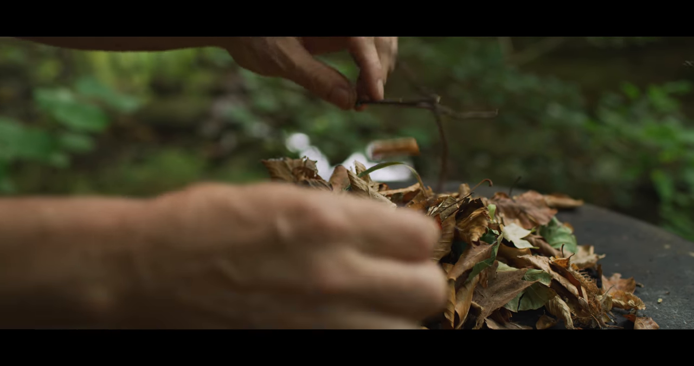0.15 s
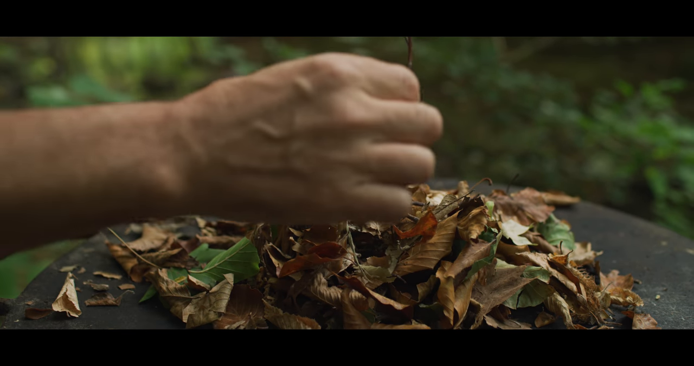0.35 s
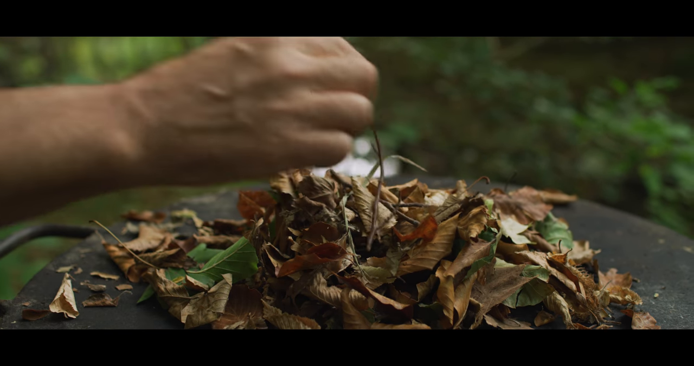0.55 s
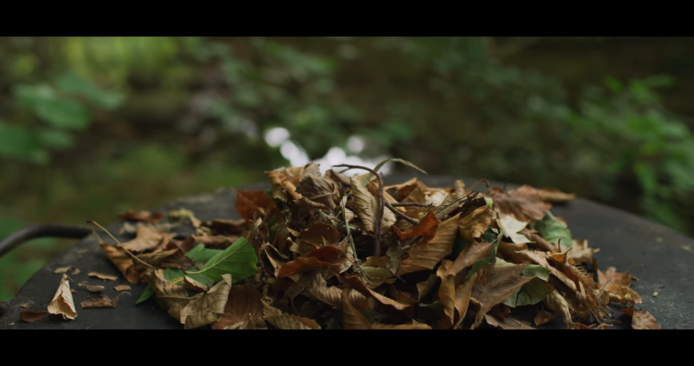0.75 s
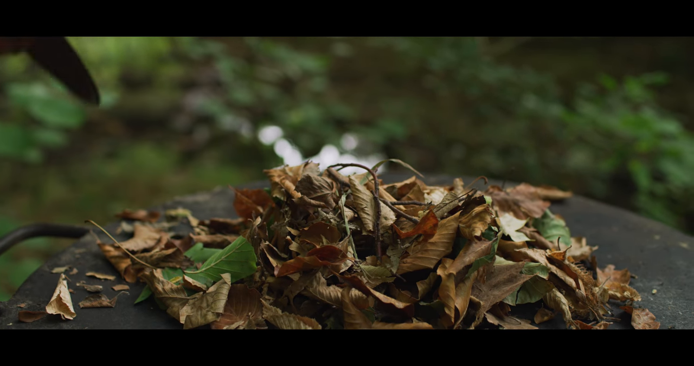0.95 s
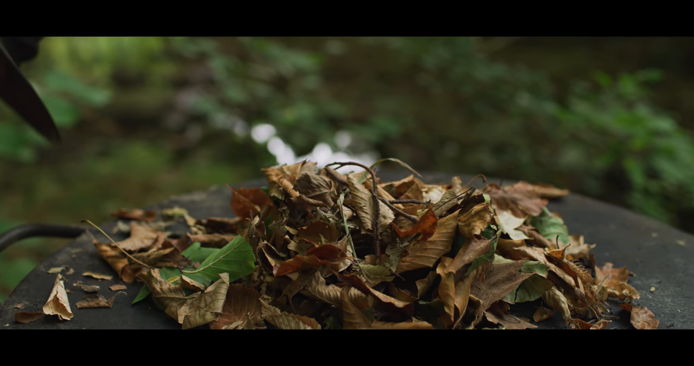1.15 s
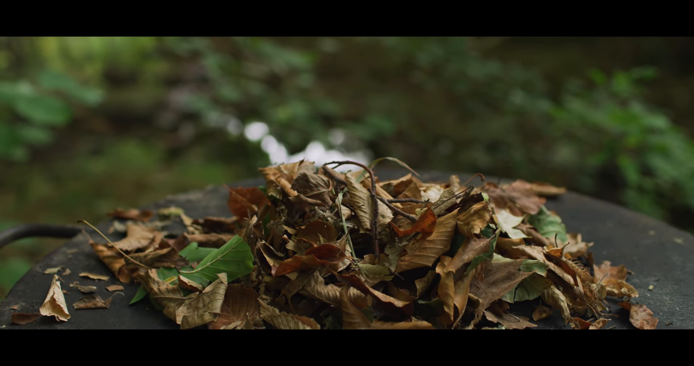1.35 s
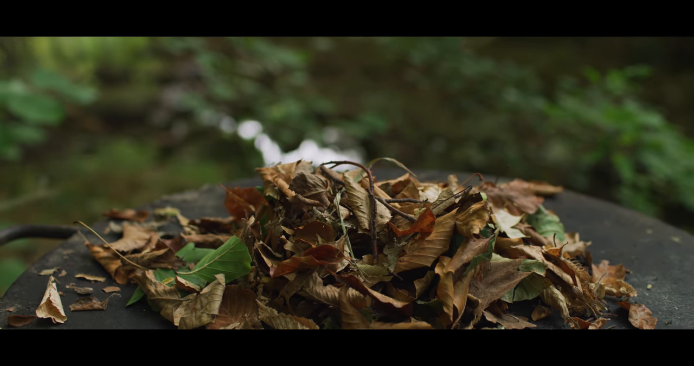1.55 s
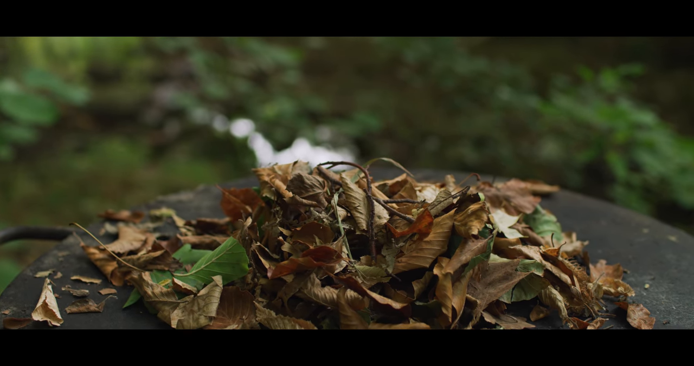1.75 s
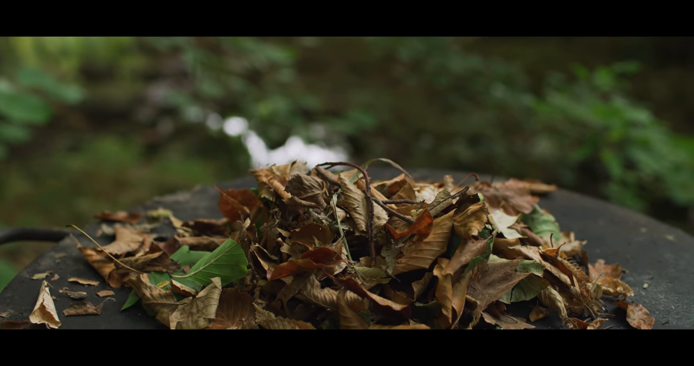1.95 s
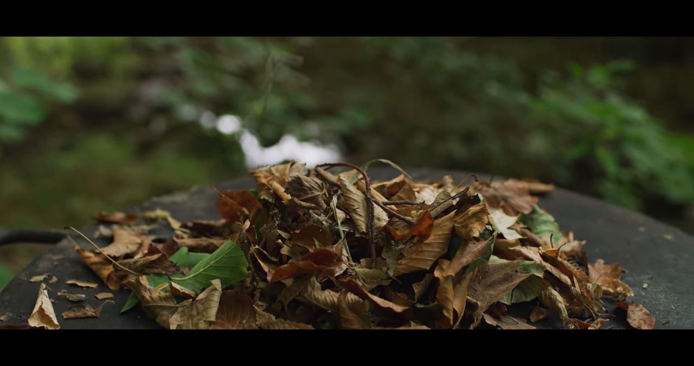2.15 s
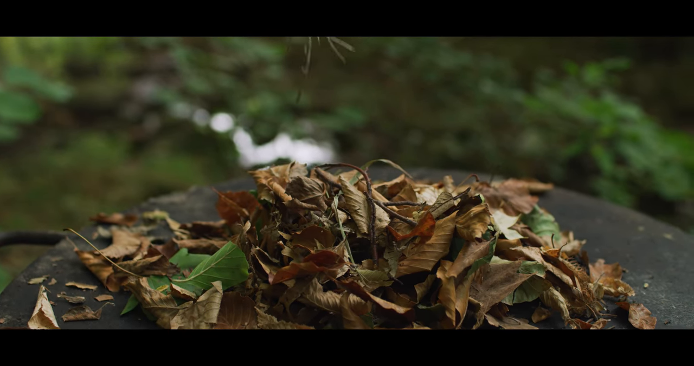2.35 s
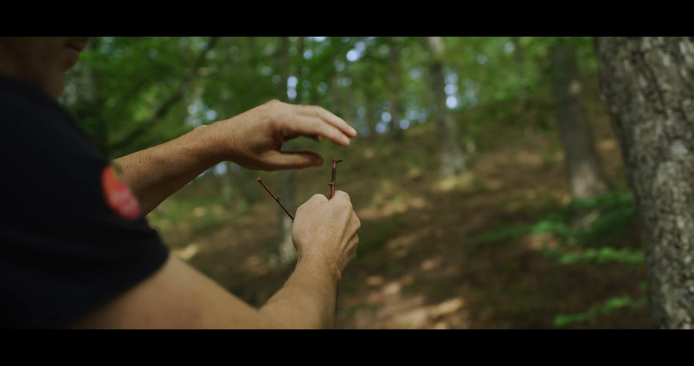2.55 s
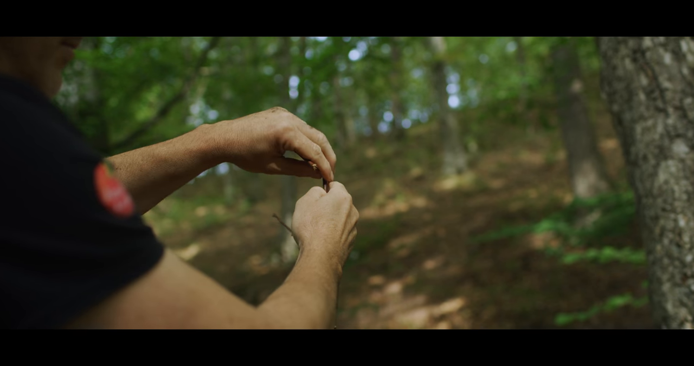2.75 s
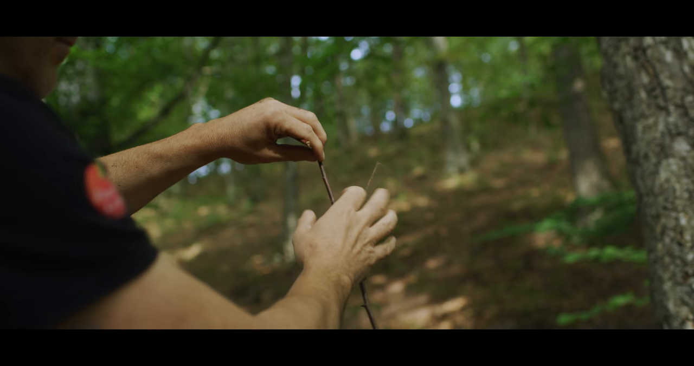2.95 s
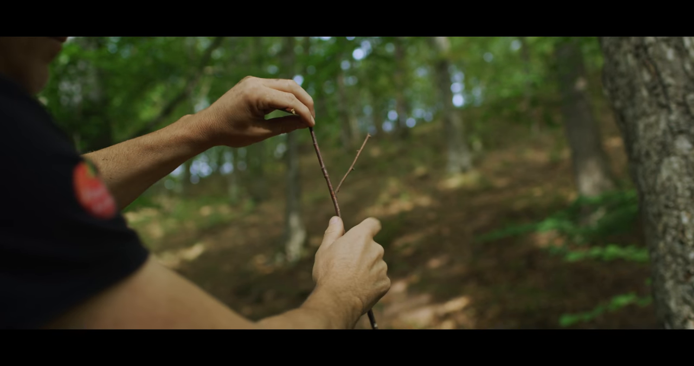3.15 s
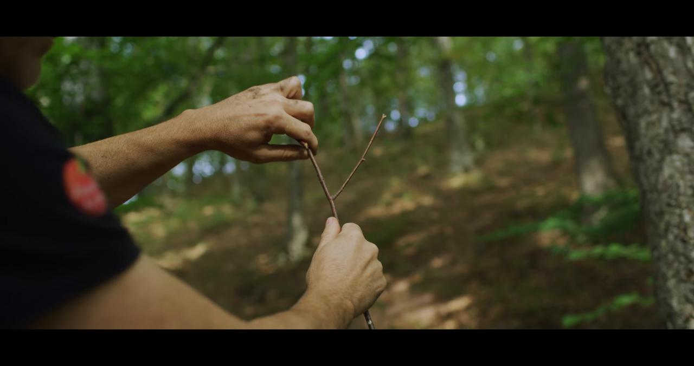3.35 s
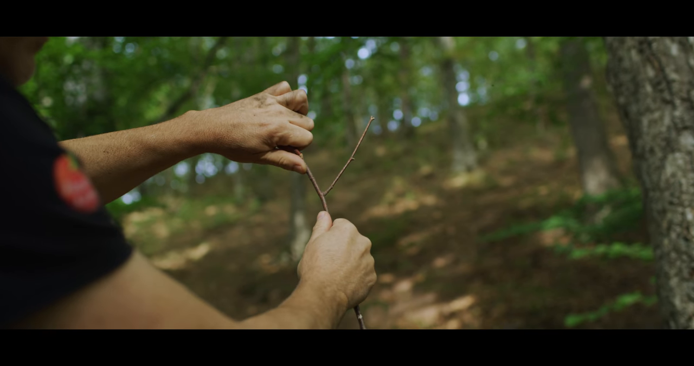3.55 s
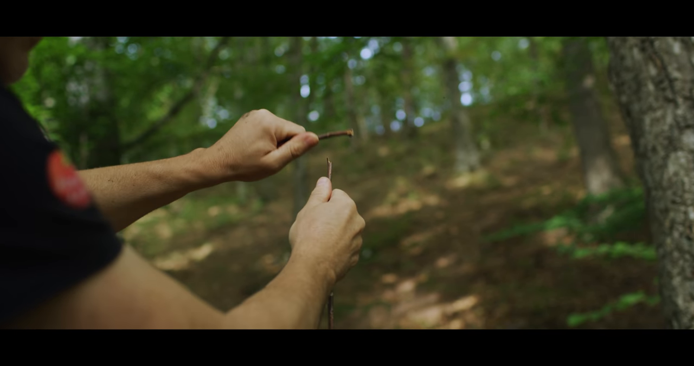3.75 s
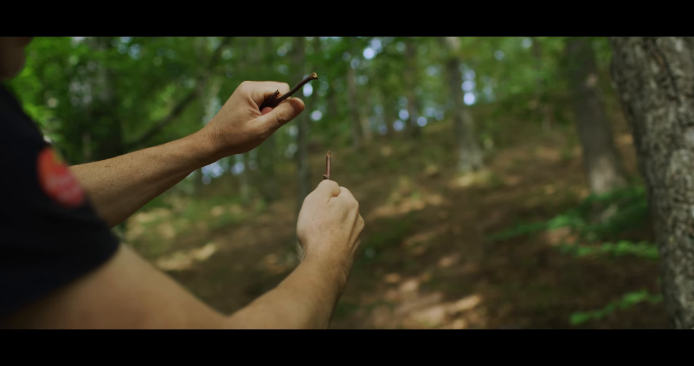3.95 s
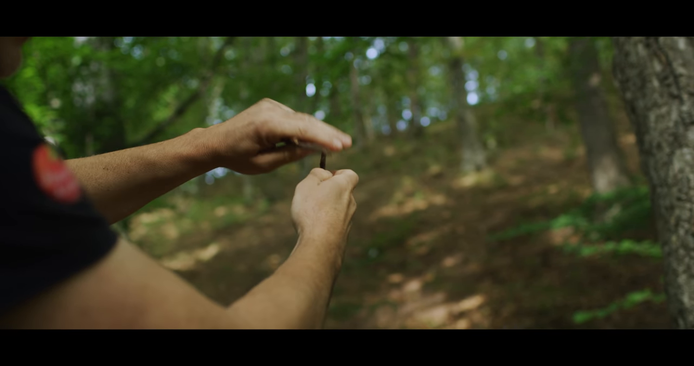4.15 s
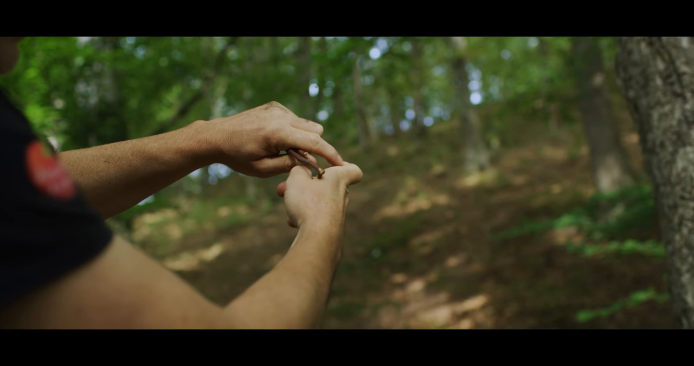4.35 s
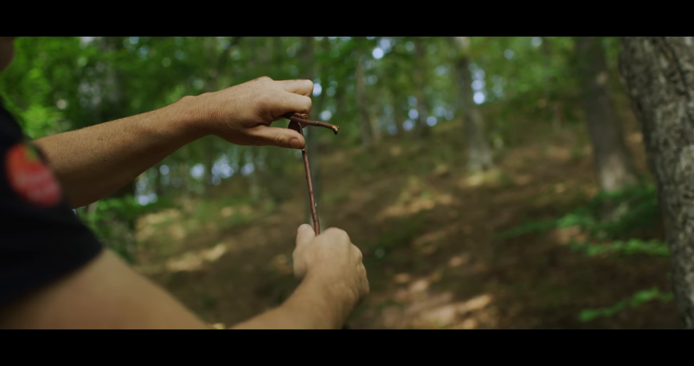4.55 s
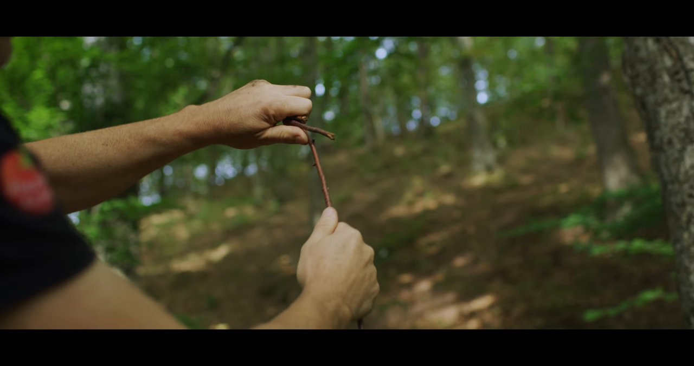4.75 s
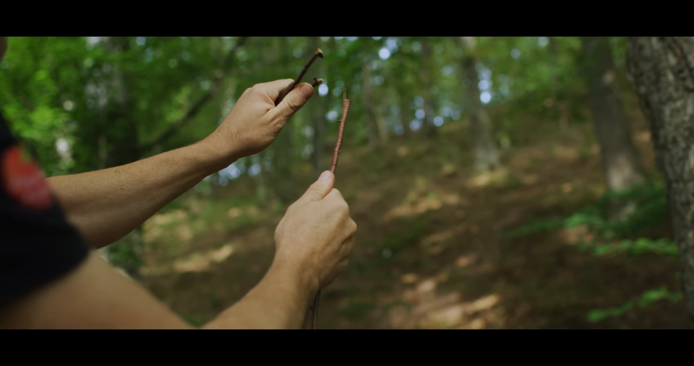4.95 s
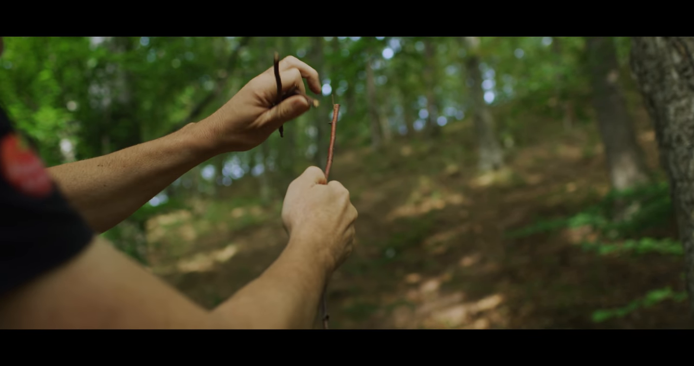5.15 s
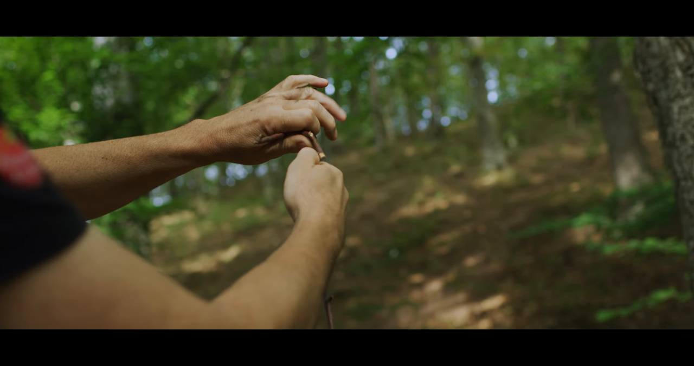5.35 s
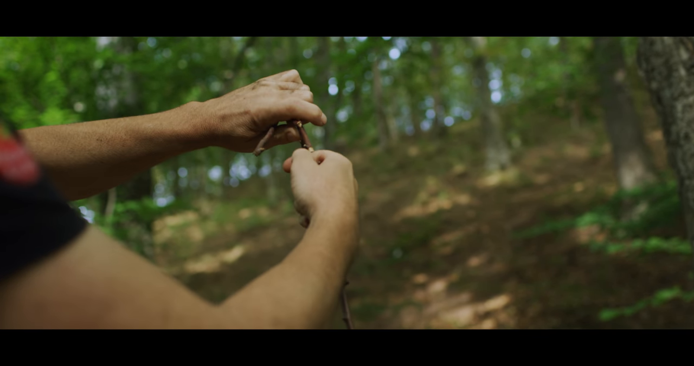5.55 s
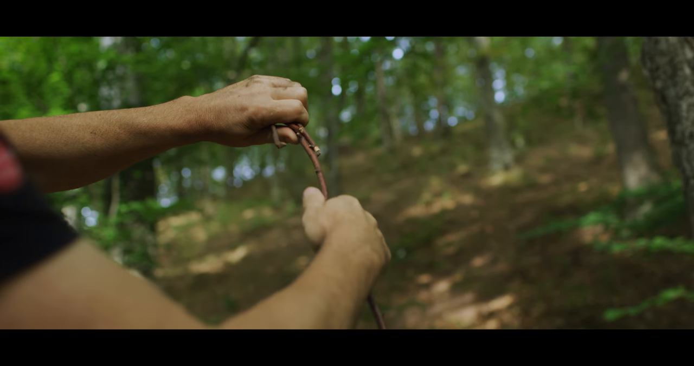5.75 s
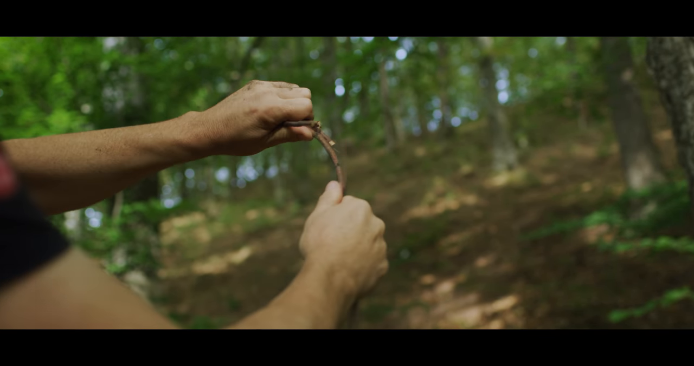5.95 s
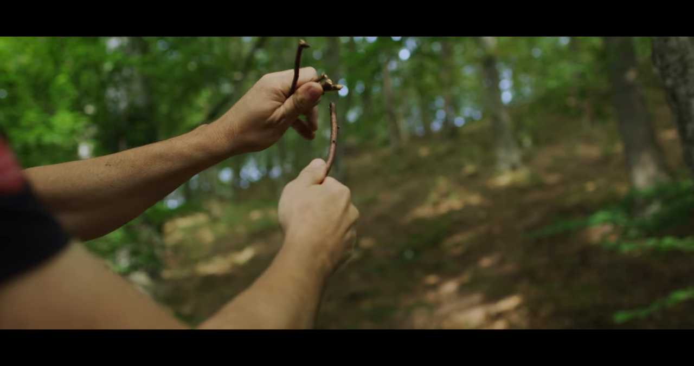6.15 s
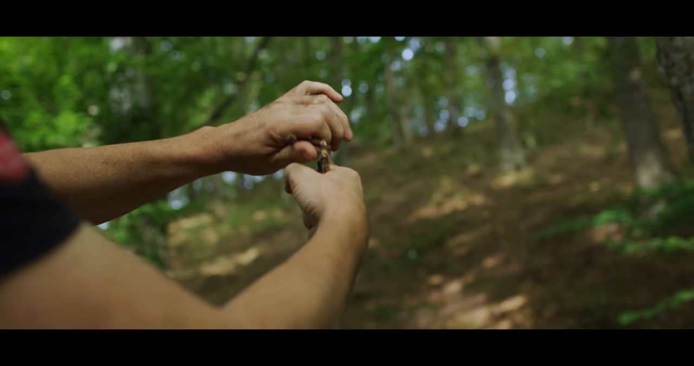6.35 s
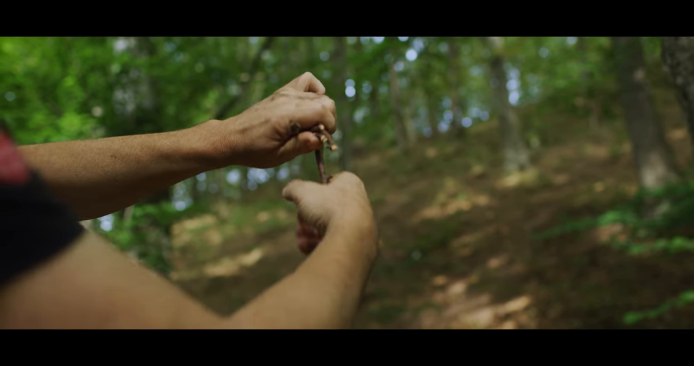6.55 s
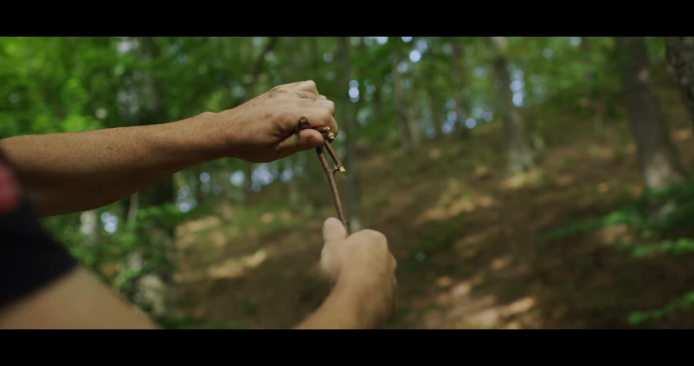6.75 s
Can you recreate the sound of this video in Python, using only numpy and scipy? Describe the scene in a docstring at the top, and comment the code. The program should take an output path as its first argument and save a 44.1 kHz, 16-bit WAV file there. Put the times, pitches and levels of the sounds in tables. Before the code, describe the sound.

Hands break dry twigs close to the microphone: first a double crack, then three single snaps a little over a second apart, the final two very loud. Faint finger scuffs on bark and small ticks of straining wood come between them. Behind this is a quiet forest, with one bird repeating a short high call, distant twitters, a light leaf rustle and a steady river that recedes after the first break.

```python
"""A forest beside a river: water hushes, dry leaves stir, far birds whistle and twitter, and a two-voiced
bird starts repeating its call. Close up, fingers scuff on bark; just after two seconds a dry twig snaps
in a double crack, then the river recedes. Three more snaps follow, single fibres ticking in the bent
wood before each. The cracks bounce off the ground and fade among the trees; the last and loudest ones
overload the input, and the birds sing on."""
import sys
import numpy as np
from scipy import signal
from scipy.fft import rfft, irfft, next_fast_len
from scipy.io import wavfile
from scipy.ndimage import uniform_filter1d

SR = 44100
rng = np.random.default_rng(int(sys.argv[2]) if len(sys.argv) > 2 else 0)


def wav_record(signal):
    """Record a signal, one row per channel, as 16-bit PCM in the file named by sys.argv[1]."""
    frames = np.transpose(np.atleast_2d(signal))
    bounded = np.clip(frames, -1, 1)
    # unit amplitude maps onto the largest positive 16-bit level
    quanta = np.round(bounded * 32767).astype(np.int16)
    wavfile.write(sys.argv[1], SR, quanta)


N = 299880
TIME = np.arange(N) / SR
CUTOFF_HZ = 16100

# stereo width of the open forest: (frequency [Hz], relative side level [dB])
WIDTH_EQ = [(100, -37.5), (300, -34.5), (700, -18.5), (1400, -27.5), (2400, -12.5), (4400, -13.5),
            (8000, -12), (15000, -25)]
# tone of the river, dry leaves, far bird chorus and distant drone: (frequency [Hz], gain [dB])
RIVER_EQ = [(76, -30), (130, -17.5), (190, -7.5), (242, -6), (423, -1.5), (517, -2.5), (1060, -1.5),
            (1490, -2.5), (2460, -5.5), (2890, -6.5), (4220, -5.5), (5480, -8.5), (9780, -18.5),
            (13200, -27.5), (15500, -41)]
LEAF_EQ = [(800, -13.5), (2000, -1.5), (5000, 12.5), (9000, 0), (13000, 3), (16000, -6.5)]
CHORUS_EQ = [(2000, -16), (3200, -8), (4200, -4.5), (5200, -7), (7000, -15), (12000, -29.5)]
DRONE_EQ = [(12, -61.5), (24, -35), (32, -10), (42, -4), (52, 5.5), (62, -5.5), (76, -10), (102, -3),
            (125, -12.5), (200, -13), (400, -39.5)]
# stirs in the leaves: (peak time [s], level [dB])
LEAF_STIRS = [(.32, -59.5), (1.28, -53), (1.42, -67), (1.6, -58), (2.05, -63), (4.21, -64), (6.75, -62)]
# thin whistles: (time [s], length [s], start [Hz], end [Hz], relative level [dB], pan left [dB])
WHISTLE_GLIDES = [(0.116, 0.07, 3900, 5880, -53, -19), (0.17, .2, 2600, 2580, -62, 3),
                  (3.07, .3, 2157, 2160, -63, 10), (3.949, 0.049, 7400, 9120, -59, 0),
                  (4.058, 0.07, 7360, 9300, -62, 0), (4.177, 0.16, 7850, 7750, -58.5, 3.5),
                  (6.33, 0.043, 7800, 6660, -64, 9), (6.384, 0.071, 6200, 5880, -58, 11),
                  (6.506, 0.06, 8100, 7200, -58.5, 8), (6.666, 0.075, 6100, 4080, -52, 9)]
# tone of the scatter off trunks and leaves: (frequency [Hz], gain [dB])
SCATTER_EQ = [(100, -4), (500, -18), (1500, -1.5), (4000, 0.5), (8000, -0.5), (15000, 0)]
# the near bird's calls, far twitters and a farther bird's chips: (time [s], relative level [dB])
NEAR_CALLS = [(0.255, -43), (1.095, -43), (1.929, -44.5), (3.221, -42), (4.637, -43.5), (5.499, -42),
              (6.579, -41)]
FAR_TWITTERS = [(0.501, -56), (1.347, -53), (1.83, -50.5), (2.559, -51), (3.11, -51.5), (3.481, -54),
                (4.099, -58), (4.75, -52.5), (5.284, -56), (6.71, -54)]
FAR_CHIPS = [(0.719, -40), (4.369, -41.5), (6.201, -39.5)]
# fingers on bark: (time [s], level [dB], decay [s], centre [Hz])
GRIP_SCUFFS = [(.603, -43.5, 0.014, 2940), (.665, -51, 0.012, 7000), (2.926, -53, 0.023, 6940),
               (5.399, -48, 0.008, 9050), (6.299, -49, 0.0045, 9000)]
# tone of dry wood cracking: (frequency [Hz], gain [dB])
CRACK_EQ = [(100, -16.5), (600, -19.5), (1200, -10.5), (2000, -11), (3400, -4.5), (5500, 0.5), (8000, -1.5),
            (11000, -3), (14000, -4.5), (16500, -11.5)]
# bending modes of the stick: (frequency [Hz], bandwidth [Hz], relative level [dB])
STICK_MODES = [(1800, 270, -6.5), (2575, 220, 2)]
# full breaks:
# (time [s], level [dB], tear decay [s], ring [Hz], relative ring [dB], knock [Hz], relative knock [dB])
SNAPS = [(2.1522, 4, 0.0019, 10460, 2, 340, -23.5), (2.2458, -6.5, 0.0018, 8930, 1, 685, -18),
         (3.6763, 4.5, 0.00038, 9600, -0.5, 800, -17), (4.8730, 14.5, 0.00093, 4260, -3, 502, -20),
         (6.0130, 15.5, 0.0017, 4810, -7, 281, -20)]
# single fibres giving way in the bent wood: (time [s], relative level [dB], ring [Hz])
FIBRE_TICKS = [(3.661, -23, 13500), (4.046, -35, 9800), (4.8191, -12, 9650), (4.8231, -9.5, 8780),
               (4.8507, -6.5, 8000), (5.179, -36.5, 11100), (5.8526, -19.5, 7300), (5.9662, -22, 10900),
               (5.9747, -13.5, 14300), (5.9931, -11.5, 8600), (5.9998, -16.5, 12900), (6.008, -16, 8800),
               (6.155, -23.5, 11100), (6.428, -28.5, 7800), (6.505, -29, 6840)]


def from_db(db):
    return 10 ** (np.asarray(db) / 20)


def unit_rms(x):
    return x / np.sqrt(np.mean(x ** 2) + 1e-20)


def unit_energy(x):
    return x / np.sqrt(np.sum(x ** 2) + 1e-20)


def tone(hz):
    return np.sin(2 * np.pi * np.cumsum(hz) / SR)


def pan(x, left_db):
    return x * from_db(left_db * np.array([[.5], [-.5]]))


def add(track, s, sound):
    """Mix a sound into a track at time s."""
    at = max(round(s * SR), 0)
    track[..., at:at + sound.shape[-1]] += sound[..., :max(N - at, 0)]


def equalise(x, curve):
    """Minimum-phase EQ along a curve of (frequency [Hz], gain [dB])."""
    size = 2 * next_fast_len(x.shape[-1])
    hz, db = np.transpose(curve)
    bin_hz = np.fft.rfftfreq(size, 1 / SR) + 1
    log_gain = np.log(from_db(np.interp(np.log(bin_hz), np.log(hz), db)))
    cepstrum = irfft(log_gain)[:size // 2]
    cepstrum[0] /= 2
    return irfft(rfft(x, size) * np.exp(rfft(2 * cepstrum, size)))[..., :x.shape[-1]]


def resonate(x, hz, width_hz):
    """A resonant band-pass with unity gain at its peak."""
    r = np.exp(-np.pi * width_hz / SR)
    feedback = [1, -2 * r * np.cos(2 * np.pi * hz / SR), r * r]
    return signal.lfilter(np.array([1, 0, -1]) * (1 - r * r) / 2, feedback, x)


def drift(t, rate):
    """Random modulation of spread about 1, with `rate` new values a second."""
    return np.interp(t * rate, np.arange(4096), rng.standard_normal(4096))


def widen(middle, side, side_db):
    """Mid and side to left and right."""
    return middle + from_db(side_db) * side * np.array([[1], [-1]])


def hush(curve, side_db):
    """A steady stereo noise bed of rms 1, widest in the birds' range."""
    middle, side = equalise(rng.standard_normal((2, N)), curve)
    return unit_rms(widen(middle, equalise(side, WIDTH_EQ), side_db))


def river(gurgle_db=2.77, near_db=-52, far_db=-57, recede_at_s=2.68, recede_s=0.19):
    """Deep, middle and bright splashing each flicker on their own; the whole hush recedes."""
    receded = .5 + .5 * np.tanh((TIME - recede_at_s) / recede_s)
    rest, gurgle = hush(RIVER_EQ, side_db=-10.5), 0
    for edge_hz in (400, 800, 1600, 3200, 6400):
        band = signal.sosfiltfilt(signal.butter(2, edge_hz, fs=SR, output="sos"), rest)
        gurgle += band * from_db(gurgle_db * drift(TIME, 55))
        rest = rest - band
    return from_db(near_db + (far_db - near_db) * receded) * (gurgle + rest)


def leaves(rest_db=-76, clicks_per_s=1500, size_db=4.0, clump_db=3.5, attack_s=0.071, release_s=.12):
    """Dry leaves rub in clumps of tiny clicks; each stir swells quickly and settles."""
    triggers = rng.random(N) < clicks_per_s / SR
    sizes = from_db(size_db * np.minimum(rng.exponential(1, N), 4) + clump_db * drift(TIME, 90))
    clicks = triggers * sizes * rng.choice([-1, 1], N)
    stirring = sum(from_db(db) * np.exp(-np.maximum((s - TIME) / attack_s, (TIME - s) / release_s))
                   for s, db in LEAF_STIRS)
    return (from_db(rest_db) + stirring) * unit_rms(equalise(clicks, LEAF_EQ))


def distance(chorus_db=-62, drone_db=-60):
    """A shimmering blur of far birds over a low distant drone."""
    chorus = from_db(chorus_db + 1.8 * drift(TIME, 10)) * hush(CHORUS_EQ, side_db=12.5)
    return chorus + from_db(drone_db) * hush(DRONE_EQ, side_db=1)


def whistles(waver=0.0062, arch=.15):
    """Far birds whistle single glides, each bowed upwards by a share of its span."""
    out = np.zeros((2, N))
    for s, length_s, start_hz, end_hz, db, left_db in WHISTLE_GLIDES:
        progress = np.linspace(0, 1, int(length_s * SR))
        span_hz = end_hz - start_hz
        hz = start_hz + span_hz * progress + arch * abs(span_hz) * np.sin(np.pi * progress)
        glide = tone(hz * (1 + waver * drift(progress * length_s, 333)))
        add(out, s, from_db(db) * pan(glide * signal.windows.tukey(len(glide), .5), left_db))
    return out


def forest_reverb(x, t60, side_db, build_up_s=.005):
    """Diffuse scatter off trunks and leaves builds up quickly and dies away."""
    t = np.arange(SR) / SR
    envelope = (1 - np.exp(-(t / build_up_s) ** 2)) * from_db(-60 * t / t60)
    middle, side = equalise(rng.standard_normal((2, SR)), SCATTER_EQ) * envelope
    tail = widen(unit_energy(middle), unit_energy(side), side_db)
    return signal.fftconvolve(x[None], tail, axes=1)[:, :N]


def bird_note(length_s, scoop_s, scoop_octaves, drop_octaves, drop_s=0.011, sag_per_s=0.763):
    """Pitch ratio and gain of a note that scoops up, sags while held and drops at the end."""
    t = np.arange(int(length_s * SR)) / SR
    scoop = scoop_octaves * np.maximum(1 - t / scoop_s, 0) ** 2
    drop = drop_octaves * np.maximum(1 - (length_s - t) / drop_s, 0)
    bend = 2 ** -(scoop + drop) * (1 - sag_per_s * (t - scoop_s))
    gain = from_db(-18.5 * (scoop + drop))  # weaker off pitch
    return bend, gain * signal.windows.tukey(len(t), .08)


def syrinx(cues, note, low_hz, high_hz, high_db, coupling_db, rasp, end_rasp=.05, wander=.006):
    """Each side sings its own pitch, hoarse at the end; their coupling adds sum and difference tones."""
    bend, gain = note
    out, t = np.zeros((2, N)), np.arange(len(bend)) / SR
    roughness = rasp + end_rasp * (t / t[-1]) ** 6
    low_cut = signal.butter(2, 2000, "high", fs=SR, output="sos")

    def voice(hz, db, flutter_db=2.5):
        pitch = hz * bend * (1 + roughness * drift(t, 892.8) + wander * drift(t, 70))
        return tone(pitch) * gain * from_db(db + flutter_db * drift(t, 301.8))

    for s, db in cues:
        low, high = voice(low_hz, 0), voice(high_hz, high_db)
        sidebands = signal.sosfilt(low_cut, from_db(coupling_db) * low * (high + 0.28 * low))
        add(out, s, from_db(db) * (pan(low, left_db=2.6) + pan(high + sidebands, left_db=6.5)))
    return out


def twitter(centre_hz=4340, length_s=0.099, swing=0.11):
    """Quick warbles whose pitch darts about."""
    out, t = np.zeros(N), np.arange(int(length_s * SR)) / SR
    for s, db in FAR_TWITTERS:
        warble = tone(centre_hz * (1 + swing * drift(t, 130)))
        add(out, s, from_db(db) * warble * signal.windows.tukey(len(t), .5))
    return out


def birds():
    """Birdsong carries through the trees: farther birds have longer tails, the twitter is all reverb."""
    call = bird_note(length_s=.071, scoop_s=.026, scoop_octaves=0.53, drop_octaves=0.45)
    chip = bird_note(length_s=0.032, scoop_s=0.0072, scoop_octaves=0.13, drop_octaves=.1)
    near = syrinx(NEAR_CALLS, call, low_hz=4373, high_hz=7310, high_db=-4.5, coupling_db=-5, rasp=.011)
    chips = syrinx(FAR_CHIPS, chip, low_hz=3860, high_hz=4950, high_db=-2.5, coupling_db=-9, rasp=.045)
    far = from_db(-7) * chips + whistles()
    near_tail = from_db(-2.5) * forest_reverb(near.mean(axis=0), t60=0.24, side_db=-4.5)
    far_tail = from_db(-4.5) * forest_reverb(far.mean(axis=0), t60=0.4, side_db=-9.5)
    twitter_wash = forest_reverb(twitter(), t60=0.38, side_db=-4.5)
    return near + near_tail + from_db(-0.5) * far + far_tail + twitter_wash


def finger_scuffs(width_hz=3600):
    """Short gritty scuffs as the fingers shift their grip on the bark."""
    out, t = np.zeros(N), np.arange(4096) / SR
    for s, db, decay_s, hz in GRIP_SCUFFS:
        grit = unit_rms(resonate(rng.laplace(size=len(t)), hz, width_hz))
        add(out, s, from_db(db) * grit * np.exp(-t / decay_s))
    return out


def fracture(tear_s, ring_hz, ring_db, splinter_db=-19, splinter_s=0.0043):
    """Fibres tear in a sharp burst, splinters follow and the stub rings."""
    t = np.arange(2048) / SR
    envelope = np.exp(-t / tear_s) + from_db(splinter_db) * np.exp(-t / splinter_s)
    burst = fill_dips(rng.standard_normal(len(t)) * envelope)
    crack = unit_energy(equalise(burst, CRACK_EQ))
    return crack + from_db(ring_db) * stub_ring(signal.unit_impulse(len(t)), ring_hz)


def fill_dips(burst, share=0.73):
    """Many fibres at once leave few gaps in the spectrum: level out most of a burst's chance dips."""
    power = uniform_filter1d(np.abs(rfft(burst)) ** 2, size=9)
    hz = np.fft.rfftfreq(len(burst), 1 / SR) + 1
    return equalise(burst, np.column_stack([hz, -share * 10 * np.log10(power + 1e-12)]))


def stub_ring(release, hz, q=14.2, overtone=1.905, overtone_db=-3):
    """The broken end rings briefly in up to two modes; thin, high-pitched splinters die soonest."""
    modes = [(hz, 0), (hz * overtone, overtone_db)]
    return sum(from_db(db) * unit_energy(resonate(resonate(release, f, f / q), f, 4 * f / q))
               for f, db in modes if f < CUTOFF_HZ)


def twigs(stub_db, stick_db=-20, fibre_cut_hz=2200):
    """At a full break the stick springs back and the hands take a dull knock; single fibres only tick."""
    out, release = np.zeros(N), signal.unit_impulse(2048)
    # neighbouring modes swing in opposite directions
    stick = sum((-1) ** (k + 1) * from_db(db) * unit_energy(resonate(release, hz, width_hz))
                for k, (hz, width_hz, db) in enumerate(STICK_MODES))
    for s, db, tear_s, ring_hz, ring_db, knock_hz, knock_db in SNAPS:
        crack = fracture(tear_s, ring_hz, ring_db + stub_db)
        knock = from_db(knock_db) * unit_energy(resonate(release, knock_hz, 0.94 * knock_hz))
        add(out, s, from_db(db) * (crack + knock + from_db(stick_db) * stick))
    low_cut = signal.butter(1, fibre_cut_hz, "high", fs=SR, output="sos")
    for s, db, ring_hz in FIBRE_TICKS:
        tick = fracture(tear_s=.00033, ring_hz=ring_hz, ring_db=stub_db - 0.5, splinter_db=-21.5)
        add(out, s, from_db(db) * signal.sosfilt(low_cut, tick))
    return out


def scene(ground_delay_s=0.0061, ground_db=-20):
    """Over the forest bed, the cracks arrive directly, off the ground, and from undergrowth and trunks."""
    scuffs = finger_scuffs()
    direct = twigs(stub_db=-0.5) + scuffs
    send = twigs(stub_db=-12) + scuffs  # summed over all directions, a crack is less coloured
    bounce = resonate(direct, hz=4006, width_hz=5160)
    ground = from_db(ground_db) * np.interp(TIME - ground_delay_s, TIME, bounce)
    undergrowth = from_db(-17) * forest_reverb(send, t60=0.046, side_db=-77.5)
    trunks = from_db(-23) * forest_reverb(send, t60=0.41, side_db=-42.5)
    return direct + ground + undergrowth + trunks + birds() + distance() + river() + leaves()


def record(dry, ceiling=0.89):
    """The loudest cracks overload the input and soft-clip; a steep low-pass trims the top."""
    clipped = dry / (1 + np.abs(dry / ceiling) ** 6) ** (1 / 6)
    return signal.sosfilt(signal.ellip(8, .2, 70, CUTOFF_HZ, fs=SR, output="sos"), clipped)


dry = scene()
out = record(dry)
wav_record(out)
```